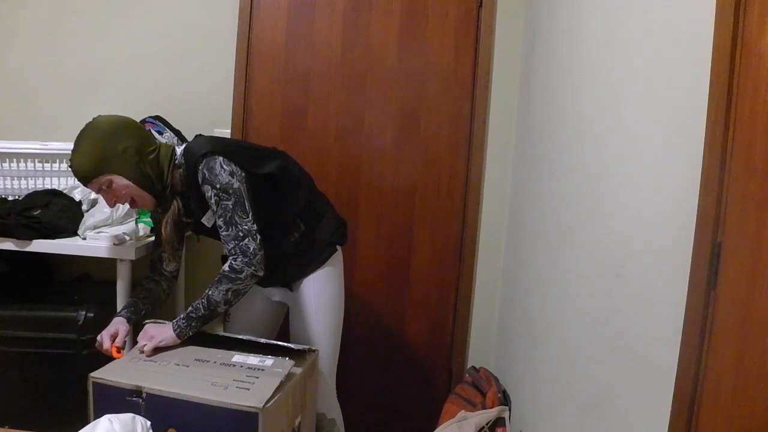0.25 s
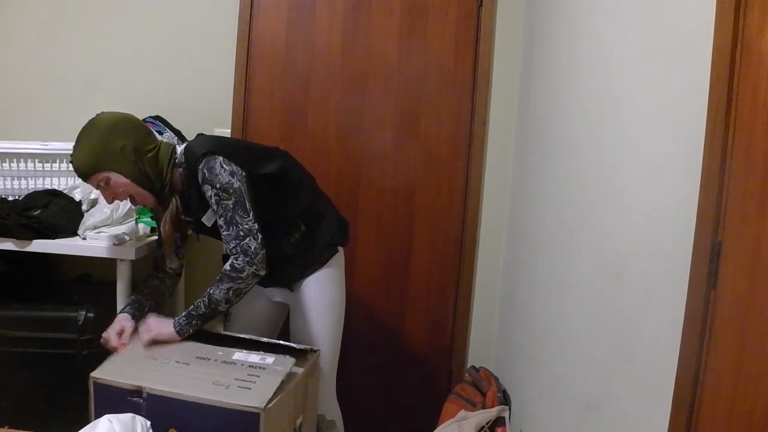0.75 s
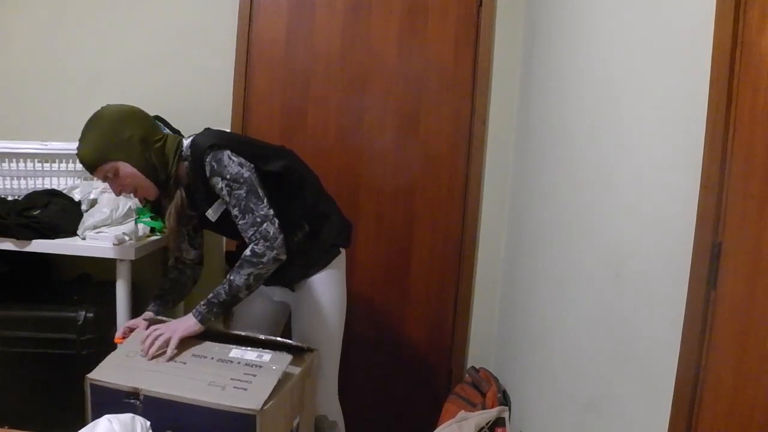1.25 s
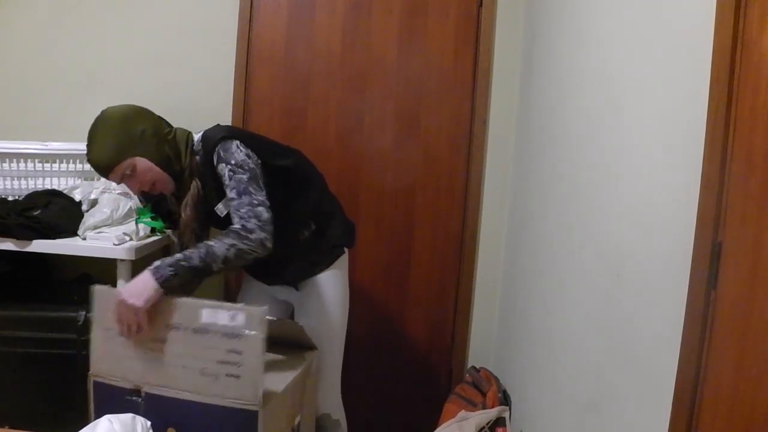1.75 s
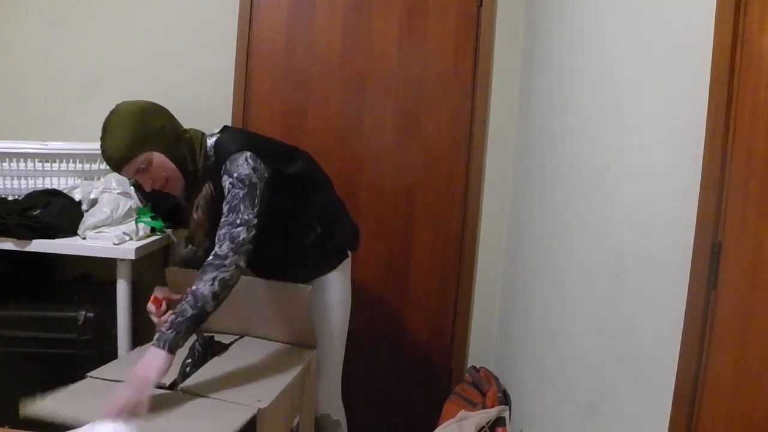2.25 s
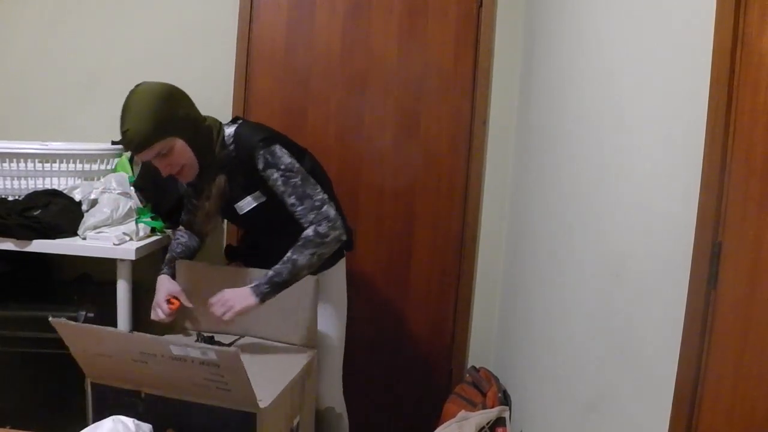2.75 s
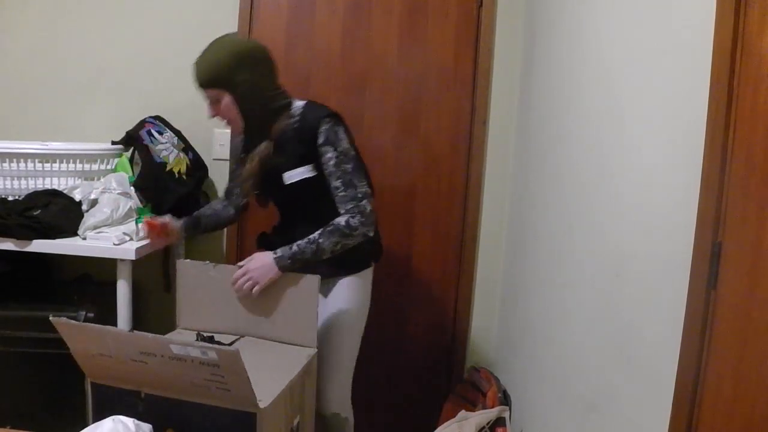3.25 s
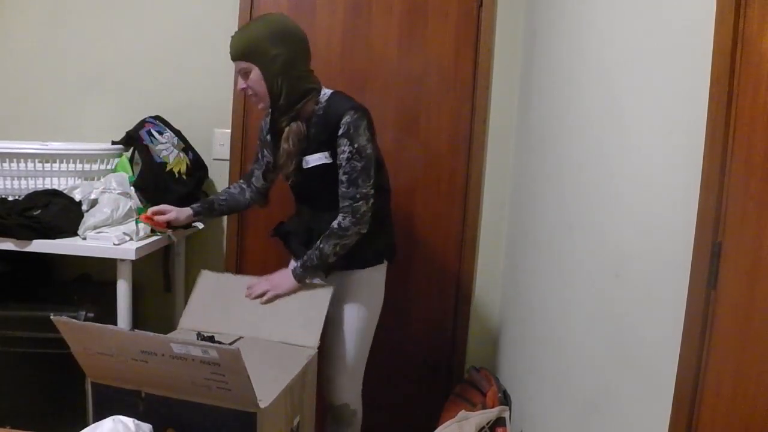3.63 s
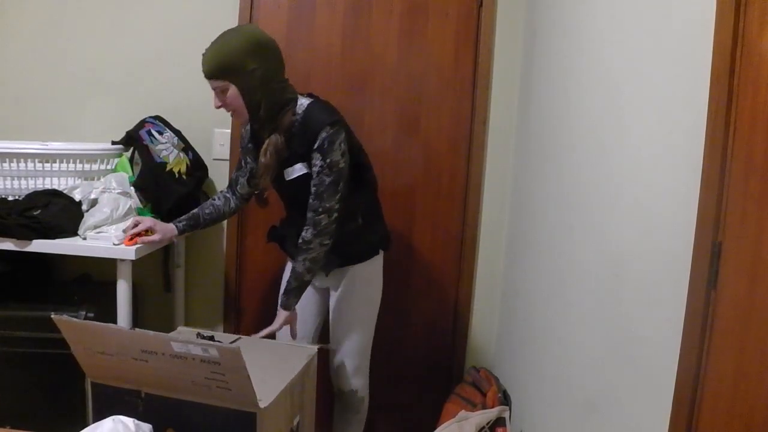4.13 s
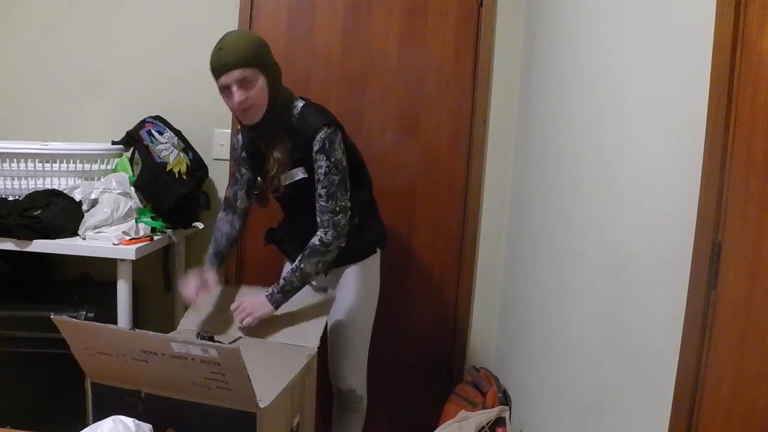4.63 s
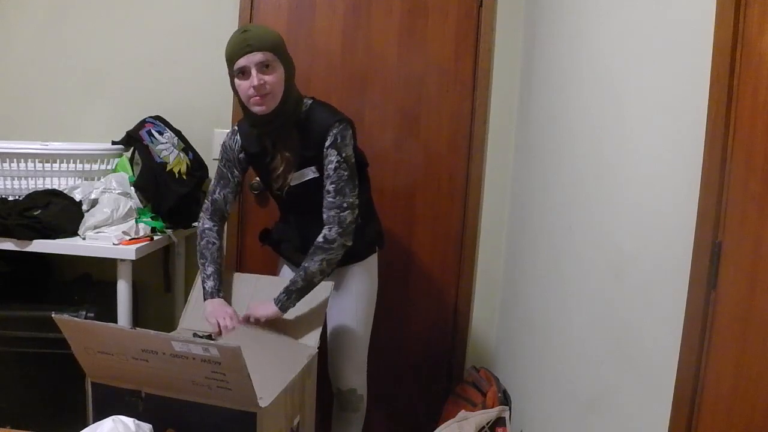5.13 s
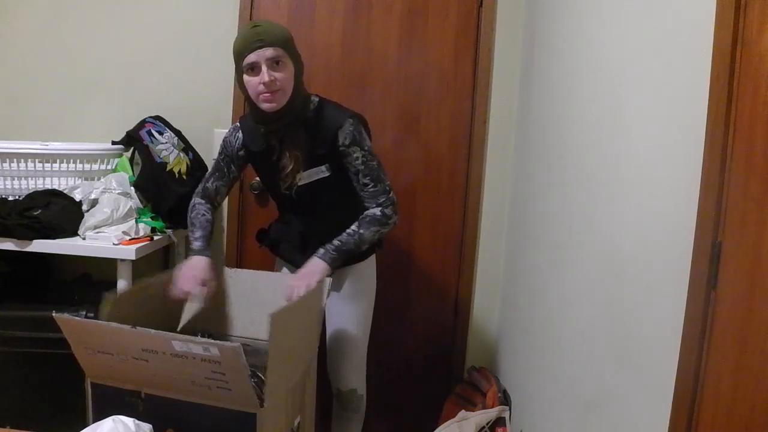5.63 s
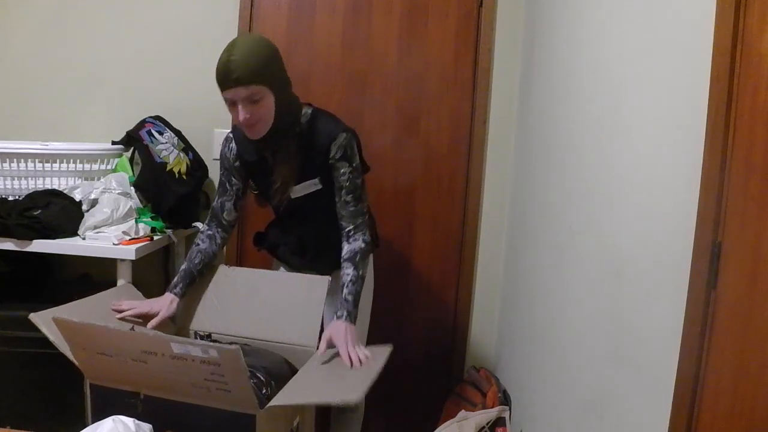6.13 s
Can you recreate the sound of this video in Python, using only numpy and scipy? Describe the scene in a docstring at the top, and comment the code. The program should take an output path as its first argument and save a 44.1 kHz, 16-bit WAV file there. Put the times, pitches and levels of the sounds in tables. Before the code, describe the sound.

A cardboard box is opened in a small furnished room, about two metres from the microphone, over a steady low hum and hiss. At first, packing tape crackles lightly while hands rub the cardboard. At 0.8 seconds the tape snaps, the loudest sound, with a few quick cracks and a hollow thump from the box. A plastic knife clacks sharply at 1.2 seconds, and the tape rips briefly around 1.5 seconds. Hands and sleeves then brush and swish over the flaps, with small ticks and an occasional faint squeak. At about 4 and 4.2 seconds the knife meets a table with clacks and low thumps. The box knocks at about 4.8 seconds, and soft rubbing and light taps continue until the end, near 6.4 seconds. Each sound has a short room echo.

```python
"""A cardboard box is opened in a small furnished room, two metres from a camera with two microphones.
Over a low hum and hiss, hands and sleeves rub the flaps throughout, with a faint squeak now and then.
The tape crackles, then snaps loudly at 0.8 s and shakes the box. A plastic knife clacks at 1.2 s, and
the tape tears at 1.5 s as its glue lets go in tiny slips. Near 4 s the knife meets a table with low
thumps; rubbing and small knocks go on to the end. The room answers each sound with a short echo."""
import sys
import numpy as np
from scipy import signal
from scipy.fft import rfft, irfft, next_fast_len
from scipy.io import wavfile
from scipy.ndimage import uniform_filter1d

SR = 44100
rng = np.random.default_rng(int(sys.argv[2]) if len(sys.argv) > 2 else 0)


def store_wav(level_fs):
    """Save 16-bit WAV to argv[1]."""
    pcm = np.round(np.clip(np.atleast_2d(level_fs), -1, 1) * 32767)
    wavfile.write(sys.argv[1], SR, pcm.T.astype(np.int16))


N = 281611
SIZE = next_fast_len(N + SR)  # a spare second lets sounds ring out
HZ = np.maximum(np.fft.rfftfreq(SIZE, 1 / SR), 1)

# The ringing tones (modes) of the air in the box and of its cardboard panels.
# Each row: pitch in Hz, level in dB, seconds to fade by 60 dB.
BOX_MODES = [(55.1, 1.5, 0.22), (123.7, -3, 0.14), (175, -1, 0.046), (214.4, 2, 0.071), (268.4, -2.5, 0.13),
             (299.6, -6.5, 0.15), (447, -12.5, 0.034)]
PANEL_MODES = [(532, 4, 0.018), (580, -4.5, 0.05), (598, -5.5, 0.014), (700, -2, 0.011), (811, 8.5, 0.0043),
               (953, -6, 0.045), (1023, -7, 0.017), (1137, 0.5, 0.0084), (1286, 0.5, 0.013),
               (1425, -1, 0.013), (1624, -9, .03), (1860, -14, 0.016), (2130, -8.5, 0.065),
               (2800, -5.5, 0.0049)]
# The tone of sharp clicks and of tearing. Each row: frequency in Hz, relative level in dB.
CLICK_COLOUR = [(1180, -7.5), (2000, -4.5), (4750, -3), (6190, -1.5), (8360, -5), (15100, -5), (16100, -22),
                (16500, -40)]


def undb(db):
    return 10 ** (np.asarray(db) / 20)


def along(table, at_hz=HZ):
    """Read a table of frequencies and values, filling in between its rows."""
    hz, value = np.transpose(table)
    return np.interp(np.log(at_hz), np.log(hz), value)


def through(x, gain):
    """Filter with one gain per frequency, scaled so that white noise keeps its power."""
    return irfft(rfft(x, SIZE) * gain / np.sqrt(np.mean(np.abs(gain) ** 2)), SIZE)[..., :N]


def pair(noise, likeness):
    """Mix two noises into left and right, as alike at each frequency as the table asks."""
    size = noise.shape[-1]
    like = np.clip(along(likeness, np.fft.rfftfreq(size, 1 / SR) + 1), -1, 1)
    mid = irfft(rfft(noise[0]) * np.sqrt((1 + like) / 2), size)
    side = irfft(rfft(noise[1]) * np.sqrt((1 - like) / 2), size)
    return np.array([mid + side, mid - side])


def background():
    """The house hums low and the microphones hiss."""
    # Each row: frequency in Hz, relative level in dB.
    colour = [(12, -38), (20, 2.5), (55, 4), (96, -2), (195, -4.5), (273, -16), (452, -19), (839, -18),
              (966, -14.5), (1740, -25.5), (3720, -29), (5360, -32.5), (15200, -29.5), (16500, -46.5)]
    # Each row: frequency in Hz, how alike left and right are from 0 to 1.
    likeness = [(60, 0.96), (300, 0.87), (700, 0.87), (1400, 0.9), (3100, 0), (7000, 0.16), (15000, 0)]
    hum = through(pair(rng.standard_normal((2, N)), likeness), undb(along(colour)))
    return hum * undb(-55) / np.std(hum.mean(axis=0))


def slips(per_second, scatter_db):
    """Surfaces catch and let go, making random clicks of uneven size (average power 1)."""
    size_db = scatter_db * np.minimum(rng.exponential(size=N), 3)
    clicks = (rng.random(N) < per_second / SR) * rng.standard_normal(N) * undb(size_db)
    return clicks / np.std(clicks)


def body(modes):
    """One tap sets off fading tones; a small object gives out little below its lowest one."""
    t = np.arange(SR // 2) / SR
    motion = sum(undb(db) / np.sqrt(fade_s) * np.sin(2 * np.pi * hz * t) * 1000 ** (-t / fade_s)
                 for hz, db, fade_s in modes)
    return signal.sosfilt(signal.butter(2, modes[0][0], "high", fs=SR, output="sos"), motion)


def ring(drive, modes):
    """Slips make an object ring at its own tones, keeping their power."""
    return through(drive, rfft(body(modes), SIZE))


def cardboard(levels, grit, colour):
    """Slips are heard directly, through the panels and through the air in the box."""
    direct, panel, thump = levels * grit
    return through(direct, undb(along(colour))) + ring(panel, PANEL_MODES) + ring(thump, BOX_MODES)


def pressure():
    """Each stroke of a hand swells and fades; overlapping strokes add their power."""
    # Each row: peak time, rise and fall in seconds, then rustle, panel ring and swish in relative dB.
    strokes = [(.098, 0.023, 0.055, -59, -70, -57), (.155, 0.031, 0.14, -66.5, -51, -47),
               (.265, 0.11, 0.089, -47, -71, -51.5), (.44, 0.046, 0.14, -57.5, -76, -55.5),
               (.545, 0.037, 0.12, -68, -82, -59), (.63, 0.032, .1, -59, -59, -56),
               (.71, 0.079, 0.16, -53, -55, -52.5), (.752, 0.018, 0.17, -48, -49, -38),
               (.92, 0.052, 0.14, -64, -52, -49), (1.06, 0.076, 0.52, -83, -50, -60),
               (1.148, 0.07, 0.031, -49, -54, -53), (1.428, .012, 0.053, -54, -62, -65.5),
               (1.5, 0.049, 0.18, -47, -39, -45.5), (1.68, 0.035, 0.043, -61, -44, -36.5),
               (1.75, .04, 0.047, -62, -66, -40), (1.787, .01, 0.035, -72, -62, -44),
               (1.819, 0.017, 0.081, -55, -50, -48), (1.9, .1, 0.11, -61.5, -64, -53.5),
               (2.07, 0.062, 0.088, -62, -54.5, -49.5), (2.167, 0.065, 0.029, -46, -46, -36),
               (2.28, 0.098, 0.052, -55.5, -51, -47), (2.325, 0.023, 0.041, -72, -50, -64),
               (2.42, 0.026, .05, -53.5, -49, -47), (2.454, 0.054, 0.037, -52, -51, -50),
               (2.81, .06, 0.12, -58, -56.5, -63), (3.045, 0.064, 0.11, -53, -51, -44.5),
               (3.13, 0.052, 0.031, -47, -52, -45), (3.198, 0.033, 0.067, -39.5, -67, -42.5),
               (3.36, 0.091, 0.083, -62, -64, -64), (3.404, 0.019, 0.11, -47, -52, -54),
               (3.6, 0.13, 0.27, -57, -51, -64), (3.7, 0.068, 0.046, -53, -57, -54),
               (3.83, 0.094, 0.12, -57.5, -59, -58.5), (3.93, .1, 0.3, -57.5, -55.5, -56),
               (4.12, 0.061, 0.24, -56.5, -52.5, -66), (4.392, 0.007, 0.038, -48, -48, -32.5),
               (4.558, 0.056, 0.037, -67, -57, -54.5), (4.82, 0.043, .2, -56, -46, -50.5),
               (4.9, 0.094, 0.082, -65, -48, -57), (5.04, 0.068, 0.069, -56.5, -67, -59),
               (5.125, .1, 0.017, -55.5, -49, -51.5), (5.2, 0.063, 0.054, -57.5, -50, -54),
               (5.28, 0.072, 0.16, -64, -53, -48), (5.355, 0.093, 0.09, -57, -54, -45.5),
               (5.459, 0.13, 0.029, -62, -54, -53), (5.61, .06, 0.14, -66, -51, -56),
               (5.673, 0.075, 0.017, -56, -45.5, -35), (5.75, 0.046, .1, -60, -51.5, -50.5),
               (5.812, 0.097, 0.051, -49, -46, -41.5), (5.94, 0.14, 0.066, -54, -49, -45),
               (6.0, 0.036, .06, -66, -45.5, -68), (6.12, 0.19, 0.14, -55.5, -50, -57.5),
               (6.26, 0.073, 0.081, -75, -54.5, -59), (6.364, 0.11, .08, -56.5, -50.5, -49)]
    t = np.arange(0, N, 64) / SR
    peak_s, rise, fall, *db = np.transpose(strokes)
    late = t - peak_s[:, None]
    away = np.maximum(-late / rise[:, None], late / fall[:, None])
    power = undb(db) ** 2 @ undb(-20 * away) ** 2  # 20 dB down one rise or fall from the peak
    return np.array([np.interp(np.arange(N) / SR, t, np.sqrt(p)) for p in power])


def hands():
    """Skin on cardboard and cloth on cloth make dense, fine slips; the pressure wavers quickly."""
    # The tone of skin and of sleeves. Each row: frequency in Hz, relative level in dB.
    skin_colour = [(1060, -29), (1800, 0.5), (3320, -2), (5610, 0.5), (6550, -1.5), (8000, -10),
                   (10400, -38.5), (17600, -120)]
    sleeve_colour = [(4710, -19), (8000, -4), (11800, -4.5), (15300, -1), (16200, -14), (16500, -52.5)]
    # The handled box booms. Each row: time in seconds, relative level in dB.
    boom_curve = [(0, -68), (.18, -50), (.45, -76), (.75, -48.5), (.9, -47), (1.05, -63), (1.3, -56),
                  (1.7, -54), (1.95, -59.5), (2.3, -60), (2.7, -59), (3.201, -56.5), (3.7, -55.5),
                  (4.102, -44), (4.6, -54.5), (4.85, -56), (5.2, -49.5), (5.6, -54.5), (5.95, -48),
                  (6.386, -55)]
    hold = SR // 40
    steps = np.repeat(rng.standard_normal((4, N // hold + 1)), hold, axis=1)
    waver_db = uniform_filter1d(steps, hold)[:, :N] * np.array([[2.7], [2.7], [4.5], [2.7]])
    rustle, panel, swish = pressure()
    boom = undb(np.interp(np.arange(N) / SR, *np.transpose(boom_curve)))
    levels = np.array([rustle, panel, boom, swish]) * undb(waver_db)
    fine = slips(12000, 1.1)
    grit = np.array([fine, slips(2000, 2), slips(600, 1.6)])
    skin = cardboard(levels[:3], grit, skin_colour)
    ticks = slips(100, 3) * undb(-8.5)  # single fibres let go
    return skin + through(levels[3] * (fine + ticks), undb(along(sleeve_colour)))


def contact(events, release_s):
    """Make one loudness curve per dB column: each event jumps up, holds and lets go."""
    levels = np.zeros((len(events[0]) - 2, N))
    t = np.arange(SR // 5) / SR
    for start_s, *db, length_s in events:
        i = int(start_s * SR)
        shape = np.exp(-np.maximum(t - length_s, 0) / release_s)[:N - i]
        span = slice(i, i + len(shape))
        levels[:, span] = np.maximum(levels[:, span], undb(db)[:, None] * shape)
    return levels


def strike(times, peak_db, modes):
    """Tap an object at each time so that it rings with the given peak."""
    taps = np.zeros(N)
    np.add.at(taps, (times * SR).astype(int), undb(peak_db))
    answer = body(modes)
    return signal.fftconvolve(taps, answer / np.max(answer))[:N]


def knocks_and_cracks():
    """Each sudden sound mixes a click, a short burst of noise, a ring and a low thump."""
    # Tape and cardboard snap, sleeve cloth ticks faintly and brightly (2.12 s), and low thumps come
    # as the knife clacks or meets the table (1.19, 3.98 and 4.20 s).
    # Each row: start in seconds, then click, ring and thump in relative dB.
    events = [(0.096, -44.5, -44.5, -53), (0.141, -44.5, -50, -62), (0.2215, -38.5, -47, -49),
              (0.2538, -39.5, -54, -50), (0.407, -57, -45, -53), (0.431, -45.5, -65, -64),
              (0.536, -52, -67, -48), (0.707, -64, -45, -44), (0.744, -39.5, -48, -48),
              (0.7801, -8.5, -5.5, -10.5), (0.7915, -19.5, -12, -21), (0.8034, -20.5, -19, -33),
              (0.8365, -23.5, -17, -28.5), (0.914, -34.5, -47, -52), (0.926, -41, -54, -67),
              (1.0036, -52, -48, -69), (1.044, -56, -57, -45.5), (1.193, -53, -27.5, -29),
              (1.426, -39.5, -52, -50), (1.4771, -31, -29.5, -53), (1.4811, -37, -52, -38),
              (1.588, -21, -19, -36), (1.7835, -43.5, -57, -68), (1.812, -32.5, -61, -66),
              (1.821, -37, -55, -50), (2.048, -50, -60, -43), (2.116, -52, -57, -58),
              (2.1221, -44, -50, -60), (2.2582, -44.5, -40, -56), (2.2712, -56, -38, -38.5),
              (2.315, -40.5, -33.5, -42), (2.3229, -58, -33, -68), (3.195, -39.5, -43.5, -42.5),
              (3.4016, -33, -57, -63), (3.984, -45, -31, -56), (4.2027, -50, -20, -33),
              (4.3892, -50, -55, -62), (4.7487, -39.5, -25.5, -31), (4.7607, -42, -50, -21.5),
              (4.7745, -40, -29.5, -47.5), (5.6, -62, -49, -57), (5.669, -42, -60, -57),
              (5.73, -53, -45, -55), (5.8033, -39, -36, -67), (5.9235, -56, -38, -65),
              (5.9356, -56, -36.5, -65), (5.989, -61, -37.5, -40), (6.218, -51, -61.5, -68)]
    times, click_db, ring_db, thump_db = np.transpose(events)
    held = [(at, db, 0.0012) for at, db in zip(times, click_db)]  # each burst holds for 1.2 ms
    bursts = contact(held, release_s=0.0005)[0] * rng.standard_normal(N) * undb(-2)
    np.add.at(bursts, (times * SR).astype(int), undb(click_db + 14))  # the opening clicks
    knocks = strike(times, ring_db, PANEL_MODES) + strike(times, thump_db, BOX_MODES)
    return through(bursts, undb(along(CLICK_COLOUR))) + knocks


def squeaks():
    """The blade or a flap's hinge catches and slips regularly, making a gliding, wavering tone."""
    # Each row: start and length in seconds, first and last pitch in Hz, level in dB, roughness 0 to 1.
    glides = [(0.186, 0.084, 1995, 1893, -55.5, 0.12), (1.508, 0.027, 1070, 994, -44, 0.08),
              (1.52, 0.017, 510, 495, -39, 0.04), (1.666, 0.025, 3750, 3740, -47.5, .06),
              (1.69, 0.054, 3460, 3610, -60, 0.04), (2.046, 0.073, 115, 108, -46.5, 0.04),
              (3.176, 0.032, 1818, 1490, -48.5, 0.19), (3.201, 0.029, 1575, 1427, -49, 0.29),
              (3.763, 0.0081, 3600, 3770, -55.5, 0.13), (3.867, 0.01, 1640, 1700, -51, 0.22)]
    out = np.zeros(N)
    for start_s, length_s, start_hz, end_hz, db, rough in glides:
        i, n = int(start_s * SR), int(length_s * SR)
        waver = uniform_filter1d(rng.standard_normal(SR // 10), size=64)[:n] * np.sqrt(64)
        hz = np.linspace(start_hz, end_hz, n) * (1 + rough * waver)
        tone = np.sin(2 * np.pi * np.cumsum(hz) / SR)
        out[i:i + n] += undb(db) * signal.windows.tukey(n) * tone
    return out


def knife():
    """Each clack or drag has a bright edge and rings the hollow handle, slider, blade and table top."""
    # Each row: start in seconds, then handle, slider, blade, table and edge in dB, length in seconds.
    clacks = [(1.155, -39, -47, -52, -63, -47, 0.0088), (1.1635, -12.5, -10, -38, -42, -11.5, 0.0014),
              (1.17, -36, -30, -42, -70, -30.5, 0.0074), (3.908, -51.5, -50.5, -62, -77, -84, 0.0095),
              (3.9752, -30, -20, -45, -18.5, -24.5, 0.0013),
              (3.9775, -25.5, -28.5, -36.5, -27.5, -29.5, 0.00506),
              (4.181, -38.5, -37, -44, -40, -36.5, 0.028), (4.198, -27.5, -19, -43, -33, -19, 0.0029),
              (4.203, -31.5, -31, -33, -25.5, -24.5, 0.0115),
              (4.215, -37.5, -39.5, -45, -38.5, -36.5, 0.057),
              (4.265, -37.5, -71, -52, -43.5, -41.5, 0.033), (4.325, -53, -71, -73, -75, -61, 0.019)]
    # The tones of each part. Each row: pitch in Hz, level in dB, seconds to fade by 60 dB.
    handle = [(2032, -6, 0.0193), (2153, -7, .025), (2296, -2, 0.027), (2814, -3.5, 0.0083)]
    slider = [(3684, -0.5, 0.02), (3830, 3, 0.041), (4123, -4, 0.02), (4340, -4.5, 0.02),
              (4850, -11, 0.025)]
    blade = [(4710, -4.5, 0.011), (4840, 4, .022), (5260, -15.5, .012)]
    table_top = [(730, -19, .02), (963, -13.5, 0.085), (1055, -1.5, .025), (1174, 12.5, 0.0078),
                 (1400, -7.5, 0.034), (1580, 1, 0.051), (3220, 6.5, .02)]
    # Each row: frequency in Hz, relative level in dB.
    edge_colour = [(3240, -27.5), (5500, -3.5), (6830, -3), (8200, -4.5), (10000, -5.5), (11200, -7.5),
                   (14100, -6), (15900, -4), (16500, -33.5)]
    *drives, edge = contact(clacks, release_s=0.0005) * slips(12000, 2.5)
    rings = sum(ring(drive, modes) for drive, modes in zip(drives, (handle, slider, blade, table_top)))
    return rings + through(edge, undb(along(edge_colour)))


def tape_tear():
    """Pulled tape lets go in thousands of glue slips a second."""
    # Each row: start in seconds, then crackle, panel ring and box thump in dB, length in seconds.
    tears = [(1.541, -27, -29, -34.5, 0.012), (1.553, -25, -27.5, -27.5, 0.024),
             (1.578, -34, -28, -50, 0.02), (1.606, -40, -58, -37, 0.012)]
    return cardboard(contact(tears, release_s=0.0026), slips(4000, 0.68), CLICK_COLOUR)


def echoes(places, size):
    """The room's answer from each place is a wash of noise, each octave fading at its own speed."""
    # Each row: frequency in Hz, seconds to fade by 60 dB.
    fade_times = [(100, 0.37), (300, 0.12), (800, 0.24), (2000, 0.18), (5000, 0.21), (13000, 0.14)]
    # Each row: frequency in Hz, how alike left and right are from 0 to 1.
    likeness = [(60, 1), (300, 0.98), (700, 0.93), (1400, 0.9), (3100, .15), (7000, 0.026), (15000, 0.031)]
    delay_s, early_s = 0.0021, 0.015
    t = np.arange(size) / SR
    bin_hz = np.fft.rfftfreq(size, 1 / SR) + 1
    noise = rfft(pair(rng.standard_normal((2, places, size)), likeness))
    onset = np.clip(t / delay_s - 0.5, 0, 1)
    early = 1 + undb(-29.5) * np.exp(-t / early_s)  # floor, door and near walls answer first
    tail = 0
    for hz in 60 * 2. ** np.arange(9):
        octave = np.clip(1 - np.abs(np.log2(bin_hz / hz)), 0, 1)
        fade = 1000 ** (-t / along(fade_times, hz)) * early * onset
        tail = tail + irfft(noise * octave, size) * fade / np.sqrt(np.sum(fade ** 2))
    return tail


def room(x, places=8):
    """Sound reaches the left microphone a little late; moving hands and flaps keep changing the echoes."""
    place_s, lag_s, max_lag_rad = 0.025, 5e-5, 1.75
    place = np.arange(N) / SR / place_s - np.arange(places)[:, None]
    share = np.sin(np.pi / 2 * np.clip(place % places, 0, 2))  # each place blends into the next
    echo = np.sum(rfft(x * share, SIZE) * rfft(echoes(places, size=16384), SIZE), axis=1)
    # The camera's housing scatters the treble, so the phase lag stops growing there.
    lag_rad = np.minimum(2 * np.pi * HZ * lag_s, max_lag_rad)
    direct = rfft(x, SIZE) * np.exp(-1j * lag_rad * np.array([[1], [0]]))
    return irfft(direct + undb(-0.5) * echo, SIZE)[:, :N]


def scene():
    """The box and knife sound in the room, over the hum and hiss."""
    handling = knocks_and_cracks() + tape_tear() + knife() + squeaks() + undb(-7.5) * hands()
    return room(handling) + background()


def record(dry):
    """The camera clips at full scale and cuts the treble above 15800 Hz."""
    low_pass = signal.ellip(6, 0.5, 60, 15800, fs=SR, output="sos")
    return signal.sosfilt(low_pass, np.clip(dry, -1, 1))


dry = scene()
out = record(dry)
store_wav(out)
```